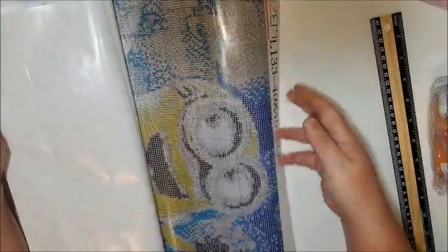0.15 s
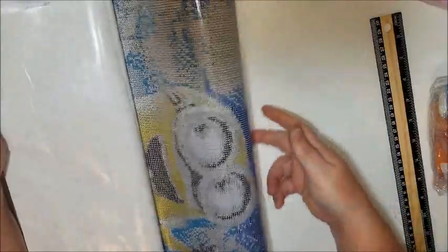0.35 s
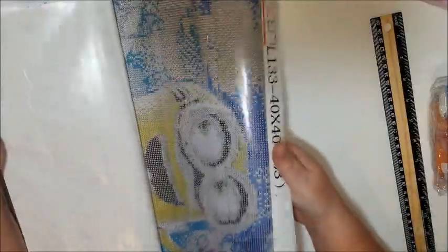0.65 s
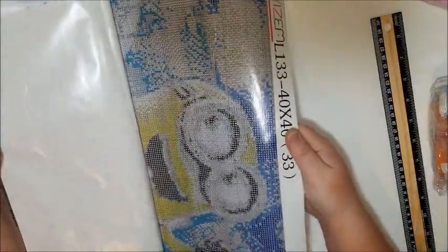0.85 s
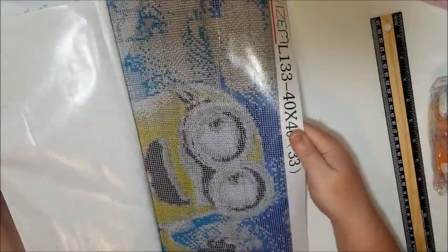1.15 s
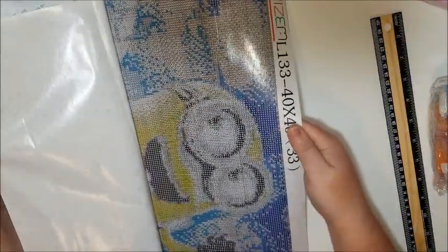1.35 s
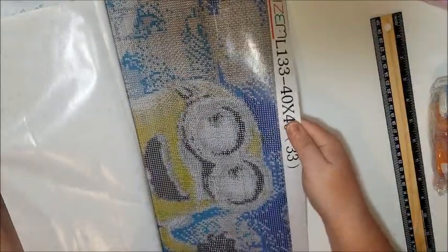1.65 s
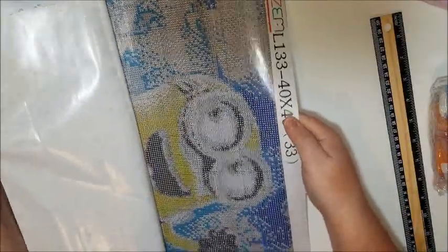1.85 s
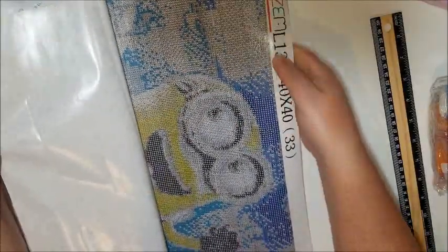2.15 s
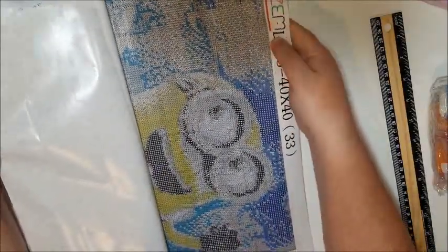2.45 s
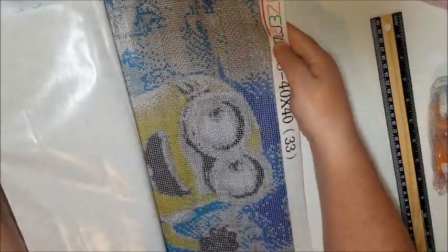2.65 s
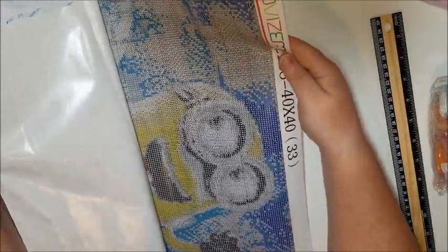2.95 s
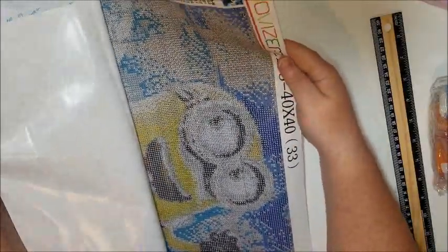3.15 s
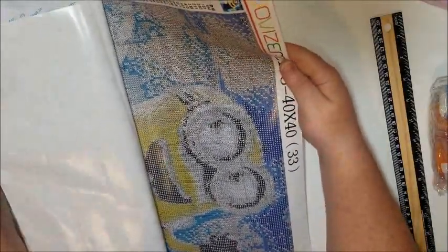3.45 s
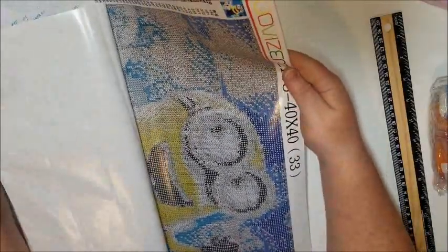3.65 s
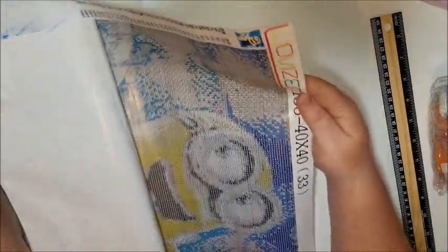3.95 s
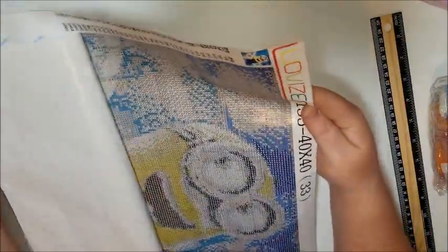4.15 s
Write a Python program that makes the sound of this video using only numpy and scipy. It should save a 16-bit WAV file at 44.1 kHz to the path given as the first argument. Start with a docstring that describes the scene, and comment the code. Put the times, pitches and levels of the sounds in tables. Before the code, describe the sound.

Close stereo sound of a craft sheet and its film being handled at a table. Loud bending, plastic rustle and a strong hollow pop come first, then softer flexing and a sharp crackling snap. After a lull, fingers brush the edge, then small pops, ticks and light crinkles follow. Low room rumble and short reflections remain throughout.

```python
"""A low rumble with hum and hiss (shaped noise, sines) underlies a hand lifting a stiff craft canvas off a table.
At once the canvas flexes (slips ring its resonance) as its plastic cover slides and crinkles (filtered slips).
A quick stutter leads to hollow pops (short rings with cracks), amid squeaks (narrow bands) and snaps (clicks);
bends roll through softly. Near two seconds fingers slide up the edge, then take a new grip with fainter
pops and snaps. A small room (echoes and decaying noise) answers throughout."""
import sys
import numpy as np
from scipy import signal
from scipy.fft import rfft, irfft, next_fast_len
from scipy.io import wavfile
from scipy.ndimage import uniform_filter1d, map_coordinates

SR = 44100
rng = np.random.default_rng(int(sys.argv[2]) if len(sys.argv) > 2 else 0)


def waveform_to_disk(signal):
    """Save audio, clipped to [-1, 1], as 16-bit WAV at the path in sys.argv[1]."""
    frames = np.transpose(np.atleast_2d(signal))
    scaled = np.clip(frames, -1, 1) * 32767
    samples = np.round(scaled).astype(np.int16)
    wavfile.write(sys.argv[1], SR, samples)


N = 189891

# Spectrum of the low rumble: [f/Hz, relative level/dB per Hz]
RUMBLE_SPECTRUM = [(25, -21), (45, -9), (60, 1), (110, -0.5), (135, -5.5), (170, -14), (260, -41),
                   (600, -83.5)]
# Spectrum of the faint hiss: [f/Hz, relative level/dB per Hz]
HISS_SPECTRUM = [(150, -5), (330, 6.5), (480, -10), (950, -6.5), (1500, -11.5), (3000, -15), (8000, -17),
                 (15000, -14.5)]
# Steady hum partials, about whose levels they waver: [f/Hz, level/dB]
HUM_PARTIALS = [(80, -74), (118, -68)]
# Brief swells of the rumble, added as power: [middle t/s, level/dB]
RUMBLE_SWELLS = [(.3, -56.5), (.55, -54), (.72, -58), (1.1, -60), (1.43, -63), (2.0, -60), (2.3, -64),
                 (2.62, -61.5), (2.96, -59), (3.22, -60.5), (3.99, -58.5), (4.25, -62)]
SWELL_HALF_S = .05
# Likeness of left and right in diffuse sound: [f/Hz, correlation (1 = identical)]
CHANNEL_LIKENESS = [(100, 0.93), (600, 0.74), (1200, 0.44), (2500, 0.11), (5000, 0.1), (12000, 0.02)]
# Pushes and slides of the hand, and the film shivering after the loud snap near 1.11 s (the row at 1.113 s):
# [t/s at full strength, attack/s, hold/s, release/s, # flexing level/dB, crinkling level/dB, sliding level/dB]
HAND_STROKES = [(0.057, 0.11, 0.035, 0.12, -36.5, -42.5, -49),
                (0.148, 0.05, 0.045, 0.24, -40, -46.5, -51.5), (0.266, 0.062, .01, 0.13, -36.5, -45, -50),
                (0.338, 0.019, 0.035, 0.13, -42, -46, -45.5), (0.391, 0.033, 0.047, 0.027, -34, -44, -54),
                (0.464, .06, 0.074, .1, -71, -52, -54.5), (0.552, 0.037, 0.0055, 0.077, -41, -39.5, -38),
                (.608, .04, .008, 0.075, -49, -47, -48.5), (0.675, .012, .006, 0.028, -46.5, -36.5, -44),
                (0.725, 0.022, 0.0076, .06, -42.5, -44, -48), (.785, .03, 0.024, 0.15, -50, -49.5, -54),
                (1.013, 0.14, 0.019, 0.16, -49, -51.5, -50.5), (1.113, .004, 0.016, .11, -67, -43, -58),
                (1.869, 0.019, 0.069, .1, -66.5, -75, -66.5),
                (1.978, 0.11, 0.33, 0.25, -61.5, -63.5, -56.5), (2.351, 0.103, 0.078, .07, -64, -63.5, -73),
                (2.562, .035, 0.075, .08, -59.5, -73, -63), (2.694, .1, 0.17, .1, -73, -79.5, -86),
                (2.89, 0.043, 0.033, .05, -70, -55.5, -68), (2.927, .015, .012, 0.037, -53.5, -48, -60),
                (3.014, 0.14, .008, .09, -53.5, -53.5, -62.5), (3.165, 0.058, .025, .2, -60, -62.5, -55.5),
                (3.374, .04, .03, 0.068, -67.5, -71, -57), (3.408, .012, .01, .09, -57, -55.5, -68),
                (3.492, .11, .01, .13, -72, -62, -52.5), (3.563, .06, .02, 0.076, -58, -58, -60),
                (3.664, 0.097, .01, 0.32, -64, -65, -67), (3.837, .03, 0.21, 0.094, -67, -68, -68),
                (3.967, 0.037, .02, 0.3, -80, -65.5, -63), (4.223, 0.058, 0.0101, .13, -59.5, -59, -59),
                (4.273, 0.053, .01, 0.14, -58.5, -61, -72.5)]
RAMP_DB = 24.5  # span of each attack and release at its stated length
# The sheet merely held: [flexing level/dB, crinkling level/dB, sliding level/dB]
RESTING_GRIP = (-78.5, -81.5, -83)
# Canvas resonance, lower as the bend opens and higher as it tightens: [t/s, f/Hz]
BEND_RESONANCE = [(0, 1083), (.1, 959), (.27, 630), (.345, 760), (.44, 858), (.56, 697), (.8, 822),
                  (1.03, 720), (1.4, 600), (2.0, 1012), (2.45, 1018), (2.8, 880), (3.02, 1000), (3.2, 760),
                  (3.58, 880), (4.3, 720)]
# Spectrum of the crinkling film: [f/Hz, relative level/dB per Hz]
CRINKLE_SPECTRUM = [(700, -13.5), (1300, 1.5), (1600, 0.5), (2200, 0.5), (3200, -0.5), (4500, -6.5),
                    (6000, -14), (9000, -20), (15000, -39)]
# Spectrum of film sliding on canvas: [f/Hz, relative level/dB per Hz]
SLIDE_SPECTRUM = [(2000, -6), (4500, 2), (6500, -2.5), (8500, -1), (12500, -3), (16000, -8)]
# Decay of the room's tail: [f/Hz, t60/s]
ROOM_DECAY = [(200, 1), (800, 0.23), (2500, .36), (6000, 0.35), (14000, 0.093)]
# Distinct early echoes: [delay/s, level/dB]
WALL_ECHOES = [(.0028, -23.5), (.0086, -35), (.0113, -20), (.0185, -20)]
# The canvas jumps into a new bend: [t/s before a common delay, level/dB, ring f/Hz,
# crack level/dB relative to the pop, before a common lift]
BUCKLE_EVENTS = [(.27, -24.5, 599, -12.5), (.339, -10, 690, -12), (.431, -22, 930, -15),
                 (.533, -35, 635, -18), (.553, -27.5, 510, -29.5), (.563, -30.5, 362, -21),
                 (.579, -34, 360, -25), (.668, -28, 677, -13), (1.1132, -29.5, 930, -5.5),
                 (2.539, -45.5, 950, -34), (3.407, -46.5, 700, -8.5), (3.429, -46.5, 765, -17.5),
                 (3.84, -43, 874, -13), (3.86, -45, 786, -20), (3.955, -42.5, 745, -13.5)]
# Spectrum of the crack within a buckle: [f/Hz, relative level/dB per Hz]
CRACK_SPECTRUM = [(700, -9), (1300, -9.5), (2100, -8.5), (4000, -19), (5500, -39.5), (15000, -46.5)]
# The lifted edge stutters in small buckles, each louder and lower than the last
STUTTER_START_S, STUTTER_GAP_S = 0.0066, .0128
STUTTER_DB, STUTTER_GROWTH_DB, STUTTER_CRACK_DB = -29, 1.3, -19.5
STUTTER_HZ, STUTTER_SAG_HZ = 1142, 35.63
# Narrow rubs and squeaks: [middle t/s, half length/s, f/Hz, glide/(octaves per s), width/share of f, level/dB]
RUB_SQUEAKS = [(0.079, 0.021, 1204, 0, .14, -33), (1.254, 0.063, 565, 0, .08, -71),
               (1.746, .06, 820, -2, .12, -68), (1.895, .015, 3200, 2, 0.093, -64.5),
               (2.033, .055, 1028, -0.5, 0.21, -60.5), (2.272, .09, 1020, 0, .22, -58.5),
               (2.883, .01, 4290, -0.5, 0.073, -64), (2.932, .012, 4700, -1.5, 0.22, -54),
               (2.935, .011, 2200, -2, .15, -55), (3.125, .03, 3490, -0.5, .055, -68.5),
               (3.165, 0.028, 820, -.5, .12, -61.5), (3.25, 0.037, 11530, -1, .07, -71),
               (3.888, 0.039, 2132, -1.5, .22, -66), (3.916, .035, 781, .5, .22, -56.5)]
# Creases in the plastic flip: [t/s, level/dB, centre f/Hz, left minus right level/dB]
CREASE_SNAPS = [(.078, -19.5, 12400, 4), (0.269, -32, 3393, 2.5), (.551, -25, 8000, -16.5),
                (.676, -29, 2930, -2), (0.726, -34, 1300, -6.5), (0.781, -31.5, 2420, 1.5),
                (.983, -23.5, 2000, -1), (1.066, -32, 4000, -10), (1.115, -17, 2300, -1),
                (1.1152, -12.5, 3700, -3), (1.88, -34.5, 3410, -1), (2.929, -31, 2300, -3.5),
                (2.939, -37, 5170, -6.5), (3.018, -39, 1500, 2), (3.408, -34.5, 4500, 6.5),
                (3.959, -40, 2104, 10), (4.028, -33, 4626, -5.5)]
# Spectrum of the shiver after a snap centred on 2600 Hz: [f/Hz, relative level/dB per Hz]
SHIVER_SPECTRUM = [(300, -1.5), (1200, -2.5), (2200, 1), (4500, 3.5), (8000, -6), (12000, -48.5),
                   (16000, -41)]
# A bend rolls through the canvas, swelling and fading: [middle t/s, level/dB, f/Hz, half length/s]
ROLLING_BENDS = [(0.276, -27, 615, 0.0037), (0.388, -27, 664, 0.0034), (0.3975, -16.5, 678, 0.0022),
                 (0.4045, -18, 582, 0.0024), (1.027, -30.5, 715, 0.0017), (3.198, -55, 550, 0.0064)]
TOP_HZ = 15850  # upper band limit


def amp(db):
    """Logarithmic level: decibels become an amplitude ratio."""
    return 10 ** (np.asarray(db) / 20)


def unit(x):
    """Root-mean-square normalization: the signal is scaled to rms 1."""
    return x / np.sqrt(np.mean(x ** 2) + 1e-20)


def along(points, hz):
    """Logarithmic frequency scale: tabulated values are interpolated on a log axis."""
    f, v = np.transpose(points)
    return np.interp(np.log(hz + 1), np.log(f + 1), v)


def shape(points):
    """Spectral envelope: a gain curve falling 12 dB an octave further below its first point."""
    return lambda hz: amp(along(points, hz)) * np.minimum(hz / points[0][0], 1) ** 2


def filtered(x, response):
    """Linear filtering: the spectrum is multiplied by a frequency response."""
    n = x.shape[-1]
    m = next_fast_len(n + 8192)
    hz = np.fft.rfftfreq(m, 1 / SR)
    return irfft(rfft(x, m) * response(hz), m)[..., :n]


def wander(rate):
    """Slow random modulation: a smooth curve through rate random knots a second."""
    knots = rng.standard_normal(int(N * rate / SR) + 4)
    return map_coordinates(knots, [np.arange(N) * rate / SR])


def spread(pair):
    """Interaural coherence: unrelated signals become stereo, alike in the bass, apart in the treble."""
    turn = lambda hz: np.arccos(np.clip(along(CHANNEL_LIKENESS, hz), -1, 1)) / 2
    mid, side = filtered(pair, lambda hz: np.array([np.cos(turn(hz)), np.sin(turn(hz))]))
    return np.array([mid + side, mid - side])


def add(track, s, sound):
    """Superposition: a sound is summed into the track at time s."""
    part = track[..., max(round(s * SR), 0):][..., :sound.shape[-1]]
    part += sound[..., :part.shape[-1]]


def background(rumble_db=-65.0, air_db=-73):
    """Incoherent power addition: swells raise a noise rumble, beside wavering hum and faint hiss."""
    t = np.arange(N) / SR
    noise = lambda spectrum: unit(filtered(spread(rng.standard_normal((2, N))), shape(spectrum)))
    hum = np.zeros(N)
    for hz, db in HUM_PARTIALS:
        level = amp(db + 2 * wander(8.6))
        hum += level * unit(np.sin(2 * np.pi * hz * t + .5 * wander(1.6)))
    power = amp(rumble_db) ** 2
    for s, db in RUMBLE_SWELLS:
        power = power + amp(db) ** 2 * np.exp(-((t - s) / SWELL_HALF_S) ** 2)
    return hum + np.sqrt(power) * noise(RUMBLE_SPECTRUM) + amp(air_db) * noise(HISS_SPECTRUM)


def effort():
    """Power addition of strokes: each swells, holds and dies away over the resting grip."""
    t = np.arange(N) / SR
    power = amp(RESTING_GRIP)[:, None] ** 2 * np.ones(N)
    for s, attack, hold, release, *levels_db in HAND_STROKES:
        ramp = np.maximum((s - t) / attack, 0) + np.maximum((t - s - hold) / release, 0)
        live = ramp < 4  # beyond this a stroke is cut off
        power[:, live] += (amp(levels_db)[:, None] * amp(-RAMP_DB * ramp[live])) ** 2
    return np.sqrt(power)


def slips(rate, scatter_db):
    """Stick-slip excitation: stereo impulses of rms 1 at random times, a few far larger than the rest."""
    size = amp(scatter_db * np.minimum(rng.exponential(size=(2, N)), 4))
    happens = rng.random((2, N)) < rate / SR
    return unit(happens * size * rng.choice([-1, 1], (2, N)))


def flexing(ring_hz, rate, scatter_db, detune, cycles):
    """Damped resonance: each slip of the weave rings the bent canvas briefly near its present pitch."""
    kicks, out = slips(rate, scatter_db), np.zeros((2, N))
    k = np.arange(SR // 60)
    for side in range(2):
        at = np.flatnonzero(kicks[side])[:, None]
        turns = ring_hz[at] * np.exp(detune * rng.standard_normal(at.shape)) * k / SR
        speed = turns[:, 1:2] * SR / ring_hz[at]  # faster flexing radiates more
        envelope = turns * np.exp(-(turns / cycles) ** 2)
        grains = kicks[side][at] * speed * np.sin(2 * np.pi * turns) * envelope
        out[side] = np.bincount((at + k).ravel(), grains.ravel())[:N]
    return unit(spread(out))


def facets(pair, patchy_db):
    """Local resonance: facets of the film favour narrow bands that come and go as it bends."""
    z = signal.stft(pair, nperseg=256)[2]
    field = uniform_filter1d(rng.standard_normal(z.shape[1:]), size=3, axis=0)  # across frequency
    field = uniform_filter1d(field, size=18, axis=1)  # along time
    return signal.istft(z * amp(patchy_db * unit(field)), nperseg=256)[1][:, :N]


def friction(spectrum, rate, scatter_db, smooth, flutter_db, patchy_db):
    """Dry friction: tiny slips of the plastic film on a smooth hiss, with a fluttering level."""
    rubbing = slips(rate, scatter_db) + smooth * rng.standard_normal((2, N))
    grains = facets(rubbing, patchy_db)
    return unit(filtered(spread(grains), shape(spectrum)) * amp(flutter_db * wander(130)))


def handling(levels, lag=0.00019, unsteady_db=0.5):
    """Forced excitation: the hand flexes the canvas, crinkles the film and slides one over the other."""
    t = np.arange(N) / SR
    ring_hz = np.interp(t, *np.transpose(BEND_RESONANCE))
    flex_gain, crinkle_gain, slide_gain = levels * amp(unsteady_db * wander(45))
    canvas = flex_gain * flexing(ring_hz, rate=1400, scatter_db=2.5, detune=0.2, cycles=1.32)
    crinkle = crinkle_gain * friction(CRINKLE_SPECTRUM, rate=350, scatter_db=1.5, smooth=0.78,
                                      flutter_db=1.25, patchy_db=3.0)
    slide = slide_gain * friction(SLIDE_SPECTRUM, rate=1200, scatter_db=1.5, smooth=1.3,
                                  flutter_db=0.9, patchy_db=1.6)
    left, right = canvas + crinkle + slide
    # after the hand takes its new grip, the sheet reaches the left channel first
    at_edge = np.clip((t - 2.5) / .03, 0, 1)
    late_right = np.roll(right, round(lag * SR))
    return np.array([left, (1 - at_edge) * right + at_edge * late_right])


def room(x, early_db, late_db, early_t60, lowest_hz):
    """Reverberation: table and near walls answer at once; the room's tail dies sooner in the treble."""
    n = SR // 2
    t = np.arange(n) / SR
    hz, frames, z = signal.stft(spread(rng.standard_normal((2, n))), SR, nperseg=256)
    decay = amp(-60 * frames / along(ROOM_DECAY, hz)[:, None])
    late = signal.istft(z * decay, SR, nperseg=256)[1][:, :n] * (t > .008)
    early = spread(rng.standard_normal((2, n))) * amp(-60 * t / early_t60) * (t > .003)
    answer = (amp(early_db) * unit(early) + amp(late_db) * unit(late)) / np.sqrt(n)
    for delay, db in WALL_ECHOES:
        for side in range(2):
            add(answer[side], delay + rng.normal(0, .0001), amp([db]))
    answer = signal.lfilter(*signal.butter(1, lowest_hz, "high", fs=SR), answer)
    return signal.fftconvolve(x, answer, axes=1)[:, :N]


def stutter(count):
    """Repeated instability: an evenly spaced run of buckles that grow and sag in pitch."""
    return [(STUTTER_START_S + k * STUTTER_GAP_S, STUTTER_DB + k * STUTTER_GROWTH_DB,
             STUTTER_HZ - k * STUTTER_SAG_HZ, STUTTER_CRACK_DB) for k in range(count)]


def buckles(delay=0.002002, ring_time=0.0021, crack_t60=0.032, crack_db=4, low_share=0.49, rise_s=.0003):
    """Snap-through buckling: the sheet pushes the air for a few milliseconds while its film cracks."""
    out, t = np.zeros((2, N)), np.arange(SR // 12) / SR
    onset = 1 - np.exp(-(t / rise_s) ** 2)
    for s, db, ring_hz, rel_db in stutter(count=5) + BUCKLE_EVENTS:
        push = np.sin(2 * np.pi * ring_hz * t) * np.exp(-(t / ring_time) ** 2)
        low_cut = signal.butter(2, ring_hz * low_share, "high", fs=SR)  # little radiates below the ring
        push = signal.lfilter(*low_cut, signal.lfilter(*low_cut, push))
        crack = unit(filtered(spread(rng.standard_normal((2, len(t)))), shape(CRACK_SPECTRUM)))
        crack = crack * amp(-60 * t / crack_t60)
        pop = push / np.abs(push).max() + amp(rel_db + crack_db) * crack
        add(out, s + delay, amp(db) * onset * pop)
    return out


def squeaks():
    """Frictional resonance: rubbing catches one resonance of the sheet, which shifts as the sheet bends."""
    out, t = np.zeros((2, N)), np.arange(N) / SR
    for s, half, centre_hz, glide, width, db in RUB_SQUEAKS:
        ring_hz = centre_hz * 2 ** (glide * np.clip(t - s, -3 * half, 3 * half))
        phase = 2 * np.pi * np.cumsum(ring_hz) / SR
        rate = 2 * width * centre_hz  # faster wandering widens the band
        tone = unit(wander(rate) * np.sin(phase) + wander(rate) * np.cos(phase))
        out += amp(db) * np.exp(-((t - s) / half) ** 2 / 2) * tone
    return out


def snaps(cycles=5, rise=0.34, tick_db=-4, tail_db=-22, tail_t60=0.07, grain_db=3, lead=.00009):
    """Impulsive radiation: a crease flips in a cycle or two with a higher tick, and the film shivers after."""
    out, t = np.zeros((2, N)), np.arange(SR // 4) / SR
    for s, db, centre_hz, pan_db in CREASE_SNAPS:
        turns = centre_hz * t
        tick = amp(tick_db) * np.sin(2 * np.pi * 2.2 * turns)
        click = (np.sin(2 * np.pi * turns) + tick) * amp(-60 * turns / cycles)  # 60 dB down after cycles
        click *= 1 - np.exp(-(turns / rise) ** 2)  # the crease takes part of a cycle to give way
        colour = lambda hz: shape(SHIVER_SPECTRUM)(hz * 2600 / centre_hz)
        grains = rng.standard_normal((2, len(t))) * amp(grain_db * wander(700)[:len(t)])
        shiver = unit(filtered(spread(grains), colour)) * amp(tail_db - 60 * t / tail_t60)
        for side, sign in enumerate((1, -1)):  # the left channel leads slightly
            gain = amp(db + sign * pan_db / 2)
            add(out[side], s - sign * lead / 2, gain * (click + shiver[side]))
    return out


def wobbles():
    """Travelling flexure: a rolling bend sounds the canvas resonance softly, with no sharp attack."""
    out, t = np.zeros(N), np.arange(N) / SR
    for s, db, ring_hz, half in ROLLING_BENDS:
        swell = np.exp(-((t - s) / half) ** 2 / 2)
        out += amp(db) * swell * np.sin(2 * np.pi * ring_hz * (t - s))
    return out


def scene():
    """Superposition of direct, reflected and ambient sound; all but the snaps and their echoes tilted right."""
    sheets = handling(effort()) + buckles() + wobbles() + squeaks()
    sheets = sheets * amp([[-1.0], [.9]]) + snaps()  # left, right balance in dB
    answer = room(sheets, early_db=-15, late_db=-14, early_t60=0.14, lowest_hz=246)
    return sheets + answer + background() * amp([[-.5], [.5]])


def record(dry):
    """Saturation and band limiting: high peaks are rounded off and nothing above TOP_HZ is kept."""
    rounded = dry / (1 + (dry / .38) ** 6) ** (1 / 6)
    return filtered(rounded, lambda hz: hz < TOP_HZ)


dry = scene()
out = record(dry)
waveform_to_disk(out)
```